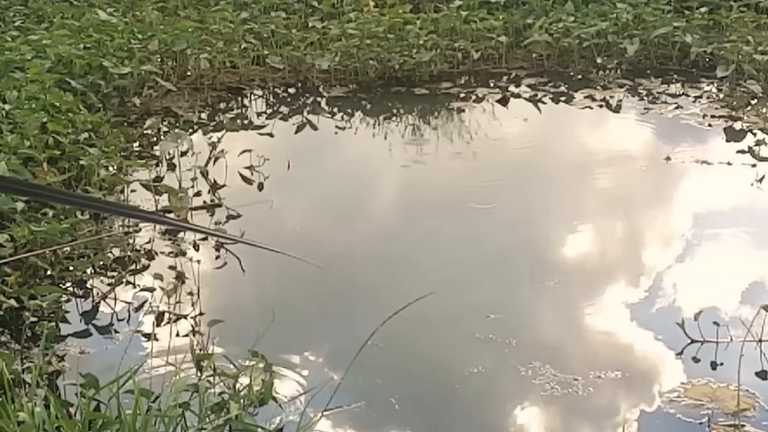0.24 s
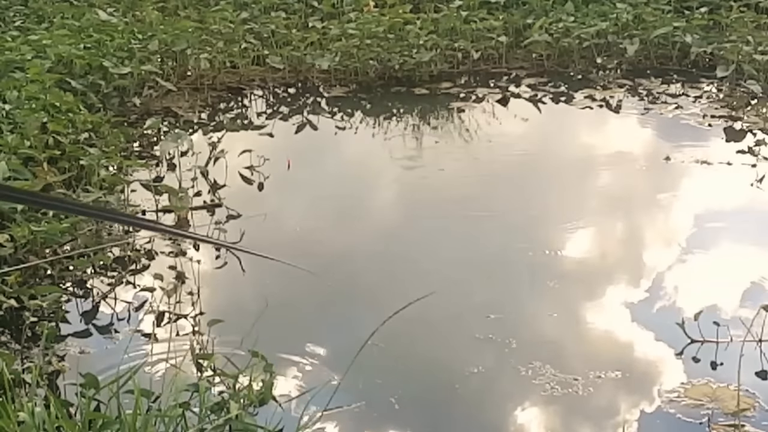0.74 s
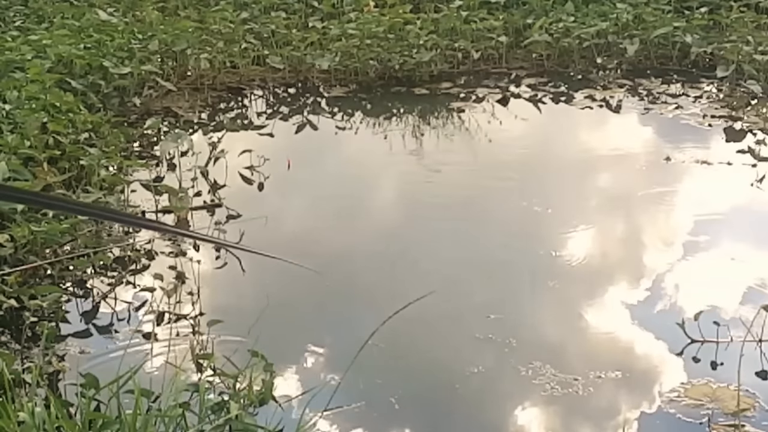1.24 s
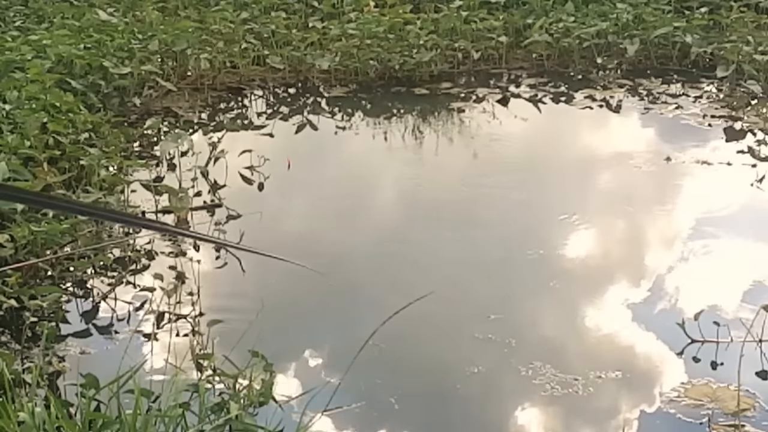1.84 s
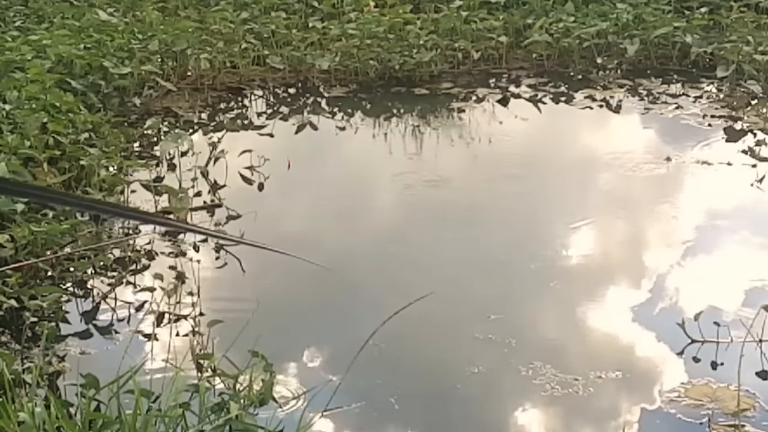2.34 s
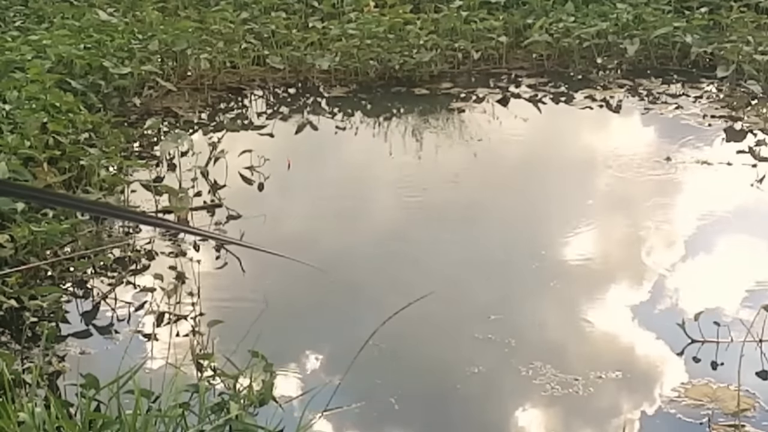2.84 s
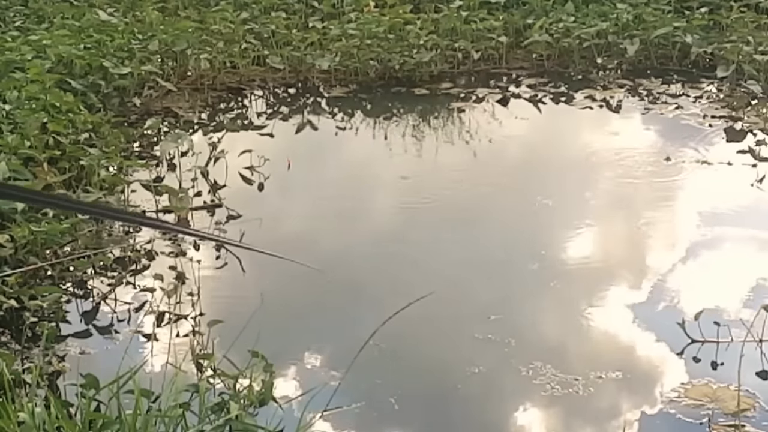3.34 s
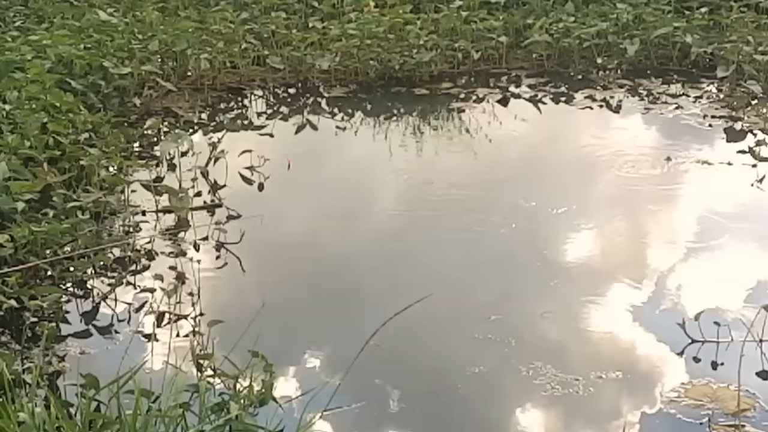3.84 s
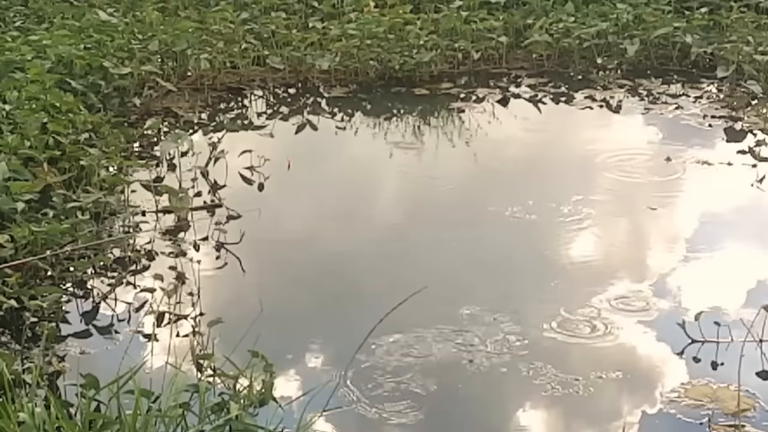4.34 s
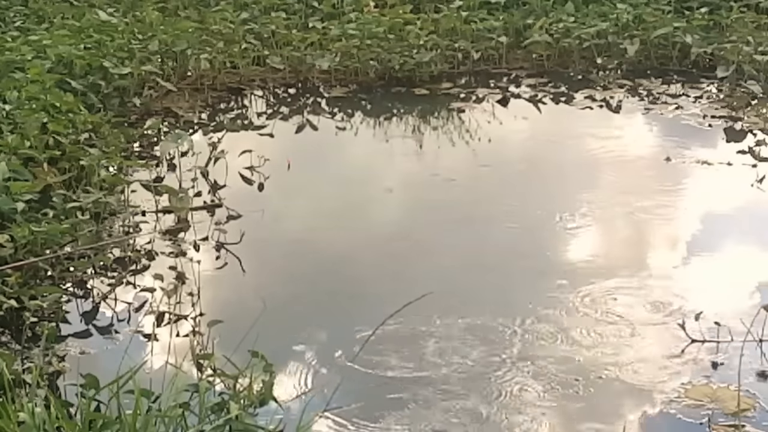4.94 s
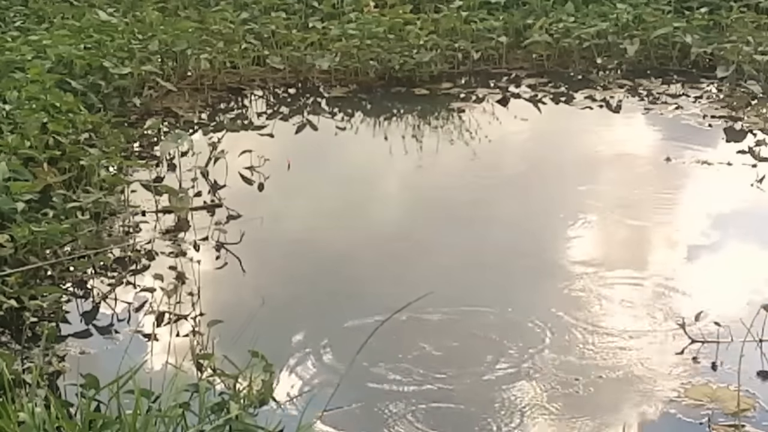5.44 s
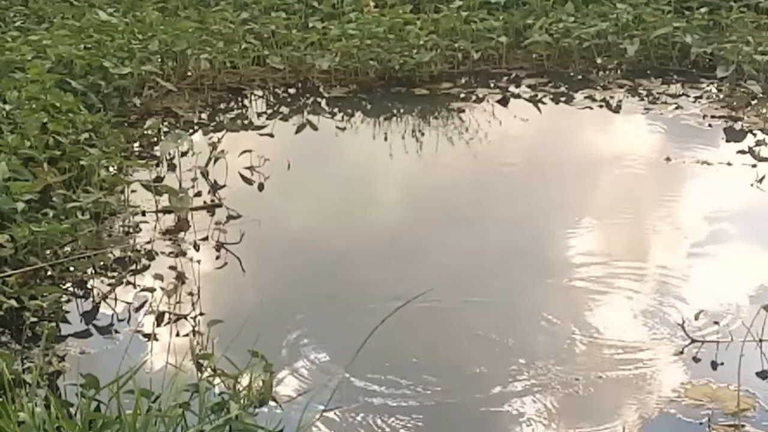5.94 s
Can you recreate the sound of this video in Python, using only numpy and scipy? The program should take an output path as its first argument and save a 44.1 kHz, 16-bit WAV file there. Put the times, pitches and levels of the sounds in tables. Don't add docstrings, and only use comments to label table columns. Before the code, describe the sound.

A quiet stereo outdoor scene of about six seconds. Throughout, insects chirr in a bright, finely pulsing band around 8 kHz, with a thinner sizzle above. Underneath, a distant engine drones near 48 and 95 Hz, sagging and recovering, with a weak pump hum, far traffic and soft field hush. Faint bird peeps fall before 1 s. Small drips sound at 0.5 s; soft low thumps at 0.75 and 1.2 s, the first with a little plop. Sparse dry ticks run from 1.8 to 3.3 s among tiny drops. From 3.5 to 3.95 s a bird repeats a quick falling note while clicks grow; around 4 s sharper rod ticks meet a small splash and fine spray lasting a third of a second. Lighter thumps come at 4.3 and 4.55 s, with knocks and drips until 4.85 s. A faint whistle rises at 5.15 s, a plop follows at 5.7 s, and a short low plop ends it near 6.2 s.

```python
import sys
import numpy as np
from scipy import signal
from scipy.fft import rfft, irfft, next_fast_len
from scipy.io import wavfile
from scipy.ndimage import uniform_filter1d, map_coordinates

SR = 44100
rng = np.random.default_rng(int(sys.argv[2]) if len(sys.argv) > 2 else 0)


def boost_factor(decibels):
    exponent = np.asarray(decibels, float) / 20
    return 10 ** exponent


def generate_wav(sig):
    pcm = np.round(np.clip(np.atleast_2d(sig).T, -1, 1) * 32767).astype(np.int16)
    wavfile.write(sys.argv[1], SR, pcm)


N = 272979
PORT_LAG_MS = 0.38


def unit(x):
    return x / np.sqrt(np.mean(x ** 2) + 1e-20)


def along(points, hz):
    f, v = np.transpose(points)
    return np.interp(np.log(hz + 1), np.log(f + 1), v)


def curves(rows):
    s, *cols = np.transpose(rows)
    return [np.interp(np.arange(N) / SR, s, c) for c in cols]


def wobble(rate):
    knots = rng.standard_normal(int(N * rate / SR) + 4)
    return map_coordinates(knots, [np.arange(N) * rate / SR])


def filtered(x, response):
    m = next_fast_len(N + 8192)
    return irfft(rfft(x, m) * response(np.fft.rfftfreq(m, 1 / SR)), m)[..., :N]


def mode(hz, width_hz):
    return lambda f: 1j * f * width_hz / (hz * hz - f * f + 1j * f * width_hz)


def ports(pair, alike, lag_ms):
    turn = lambda f: np.arccos(np.clip(alike(f), -1, 1)) / 2
    mid, side = filtered(pair, lambda f: np.array([np.cos(turn(f)), np.sin(turn(f))]))
    late = lambda f: np.exp(1j * np.pi * f * lag_ms / 1000 * np.array([[1], [-1]]))
    return filtered(np.array([mid + side, mid - side]), late)


def rush(spectrum, patchy_db):
    # frequency in Hz, likeness from 0 to 1.
    likeness = [(100, .99), (200, .96), (350, .8), (600, .66), (1000, .52), (1500, .48), (2500, .3),
                (4000, .08)]
    z = signal.stft(rng.standard_normal((2, N)), nperseg=512)[2]
    field = uniform_filter1d(rng.standard_normal(z.shape[1:]), size=6, axis=0)
    field = uniform_filter1d(field, size=12, axis=1)
    pair = signal.istft(z * boost_factor(patchy_db * unit(field)), nperseg=512)[1][:, :N]
    pair = filtered(pair, lambda f: boost_factor(along(spectrum, f)))
    return unit(ports(pair, lambda f: along(likeness, f), PORT_LAG_MS))


def add(track, s, sound):
    part = track[..., round(s * SR):][..., :sound.shape[-1]]
    part += sound[..., :part.shape[-1]]


def insects():
    # wing pitch in Hz, width in Hz, level in dB, left over right in dB,
    # left-right likeness from 0 to 1, lag of the right port in ms.
    singers = [(7624, 515, -56, -5.5, 0.7, -0.04), (8245, 540, -57, 0, 0, 0.069),
               (8074, 506, -50.5, 1, 0, -0.019), (7807, 870, -53, -2.5, 0, 0.0066),
               (8557, 530, -65.5, 11.5, 0.3, -0.0007), (9260, 1400, -75, 9.5, 0, -0.081)]
    # phrases per second, time of a phrase peak in seconds,
    # share of silence from 0 to 1, wing strokes per second, stroke depth from 0 to 1.
    rhythms = [(9.05, .005, .6, 123.74, .35), (15.02, .035, .55, 96.3, .4), (20, 0, .04, 100.3, .1),
               (13.9, 0, .1, 92, .2), (19.9, 0, .15, 100.3, .2), (11, 0, .1, 88, .1)]
    # time in seconds, level in dB.
    swells = [
        (0.0, -79),
        (0.65, -78.5),
        (0.79, -77),
        (1.71, -77.5),
        (1.84, -77),
        (3.55, -79.5),
        (4.0, -77),
        (5.14, -79.5),
        (6.19, -76.5),
    ]
    # frequency in Hz, level in dB per Hz.
    grass_colour = [(8000, -33), (9700, -7), (10500, -12), (11200, 2.5), (12000, 1), (13500, 3.5),
                    (14600, 0), (16000, -8)]
    t, out = np.arange(N) / SR, np.zeros((2, N))
    for singer, rhythm in zip(singers, rhythms):
        hz, width_hz, db, pan_db, alike, lag_ms = singer
        rate, peak, hush, strokes, depth = rhythm
        turn = rate * (t - peak)
        phrase = 1 - hush + hush * 2 * np.cos(np.pi * turn) ** 4
        beat = strokes * t + .5 * ((turn + .5) % 1) + 0.023 * wobble(8.3)
        stroke = 1 - depth + depth * 2 * np.cos(np.pi * beat) ** 2
        rasp = phrase * stroke * boost_factor(0.95 * wobble(2.58)) * rng.standard_normal((2, N))
        wing = filtered(rasp, lambda f: mode(hz, width_hz)(f) ** 3)
        heard = unit(ports(wing, lambda f: alike + 0 * f, lag_ms))
        out += boost_factor(db + np.array([[pan_db], [-pan_db]]) / 2) * heard
    chirr = boost_factor(-54 + 3 + 0.39 * wobble(1.7)) * unit(out)
    swell_db, = curves(swells)
    sizzle_db = swell_db + 4 + 0.2 * wobble(7.4) + 0.44 * wobble(25) + [[1.2], [-1.2]]
    return chirr + boost_factor(sizzle_db) * rush(grass_colour, patchy_db=-0.5)


def rod():
    # start in seconds,
    # peak in dB, pitch in Hz, crack level in dB, upward reach of the crack in octaves.
    ahead_clicks = [(1.828, -55.5, 3030, -13, .6), (2.165, -60, 5710, -16, .4),
                    (2.449, -56, 2600, -8.5, 0.59), (2.959, -59, 2726, 7, 0.72), (3.238, -60, 2521, 2, .55),
                    (3.475, -50.5, 3190, -5, .6), (3.4806, -54.5, 3434, 10, 0.66),
                    (3.5231, -55.5, 2450, 8, 0.84), (3.978, -50.5, 1170, 12, 1.8),
                    (4.0486, -61, 4380, 11, 0.87), (4.051, -51, 2263, 8.5, 2.02),
                    (4.0566, -65.5, 4008, 22.5, 1.1), (4.568, -63, 3000, 10, 0.62),
                    (4.836, -62, 4500, 8, 0.59)]
    left_clicks = [
        (2.577, -51, 2285, -10, 0.68),
        (2.705, -50, 2360, -3, 0.8),
    ]
    right_clicks = [
        (4.5178, -51.5, 3010, 3.3, 0.77),
        (4.7449, -47, 2113, 3, 0.95),
    ]
    out, t = np.zeros((2, N)), np.arange(SR // 20) / SR
    places = [(0, ahead_clicks), (PORT_LAG_MS, left_clicks), (-PORT_LAG_MS, right_clicks)]
    for lag_ms, clicks in places:
        for s, db, hz, crack_db, reach in clicks:
            ring = boost_factor(-60 * t / 0.014) * np.sin(2 * np.pi * hz * t)
            snap = (t == 0) + 0.3 * boost_factor(-60 * t / 0.0027) * rng.standard_normal(len(t))
            top_hz = min(hz * 2 ** np.clip(reach, .3, 4), 13000)
            band = signal.butter(2, [0.97 * hz, top_hz], "bandpass", fs=SR)
            contact = boost_factor(db) * (ring - boost_factor(crack_db + 15.0) * signal.lfilter(*band, snap))
            add(out[0], s - lag_ms / 2000, contact)
            add(out[1], s + lag_ms / 2000, contact)
    return out


def bubbles(s, length, db, hz, spread):
    shape = (max(60, round(1400 * length)), 1)
    start, pitch, size = rng.random(shape), rng.standard_normal(shape), rng.exponential(size=shape)
    t = np.arange(round((length + .04) * SR)) / SR
    age = np.clip(t - length * start ** 1.2, 0, None)
    cycles = hz * 2 ** (spread * (pitch - pitch.mean())) * age
    tone = np.sin(2 * np.pi * cycles * (1 + .006 * cycles)) * np.exp(-cycles / 6)
    return boost_factor(db) * unit((boost_factor(2 * size) * tone).sum(axis=0))


def water():
    # start in seconds, length in
    # seconds, level in dB, pitch in Hz.
    trickles = [
        (0.568, 0.088, -70.5, 1910),
        (1.416, .012, -67, 1570),
        (2.532, 0.018, -68, 2000),
        (2.73, .09, -78.5, 2430),
        (3.081, 0.076, -71.5, 2400),
        (3.303, 0.018, -77, 2350),
        (3.362, 0.093, -74.5, 2500),
        (4.521, 0.029, -66.5, 2212),
        (4.768, 0.027, -72, 2423),
        (3.989, .05, -68, 1530),
    ]
    drips = [(.54, 0.027, -58, 1510), (1.192, .03, -63, 1540), (2.51, 0.053, -67, 1540),
             (2.27, 0.034, -78, 2150), (3.34, .06, -69, 1280), (3.975, 0.051, -65, 1402),
             (4.025, 0.027, -62, 2500), (4.515, .04, -60.5, 511), (4.52, .04, -61.5, 1304),
             (4.671, 0.023, -61.5, 1348), (4.66, 0.033, -70, 2120), (4.768, .035, -57, 996)]
    splashes = [
        (0.543, 0.034, -73, 2310),
        (.72, 0.026, -62.5, 667),
        (2.163, 0.0082, -59, 475),
        (4.044, 0.021, -65, 1720),
        (4.069, .28, -72, 5380),
        (4.31, .05, -62.5, 688),
        (5.71, .04, -64.5, 1175),
        (6.183, 0.0085, -53.5, 500),
    ]
    pitch_spreads = (.07, .19, .5)
    # start in seconds, peak in dB, pitch in Hz, time to fall 60 dB in seconds.
    thumps = [
        (0.736, -31, 145, 0.056),
        (1.204, -33, 141, 0.063),
        (4.336, -38, 138, 0.058),
        (4.547, -38.5, 121.5, 0.05),
    ]
    out, t = np.zeros(N), np.arange(SR // 6) / SR
    for clusters, spread in zip((trickles, drips, splashes), pitch_spreads):
        for s, length, db, hz in clusters:
            add(out, s, bubbles(s, length, db, hz, spread))
    for s, db, hz, t60 in thumps:
        swell = 1 - np.exp(-t / 0.012)
        add(out, s, boost_factor(db + 8.5 - 60 * t / t60) * swell * np.sin(2 * np.pi * hz * t))
    return out


def bird(notes, lag_ms):
    out = np.zeros(N)
    warble = wobble(90)
    for s, length, from_hz, to_hz, db in notes:
        u = np.linspace(0, 1, round(length * SR))
        tone = np.sin(2 * np.pi * np.cumsum(from_hz + (to_hz - from_hz) * u) / SR)
        add(out, s, boost_factor(db + 3) * np.sin(np.pi * u) ** .3 * tone)
    return ports(np.array([out * boost_factor(1.8 * warble), np.zeros(N)]), np.ones_like, lag_ms)


def birds():
    # start in seconds, length in seconds, level in dB.
    song_notes = [
        (3.493, .025, -70),
        (3.606, 0.027, -66.5),
        (3.711, .036, -64.5),
        (3.81, .043, -64),
        (3.936, 0.027, -65),
    ]
    # start in seconds, length in seconds,
    # first pitch in Hz, last pitch in Hz, level in dB.
    peeps = [
        (0.091, .05, 2880, 2920, -73),
        (0.126, 0.24, 2340, 2250, -78),
        (0.302, 0.07, 2910, 2800, -75),
        (0.637, 0.0399, 2920, 2800, -73),
        (0.699, 0.044, 2620, 2520, -69),
        (0.954, 0.029, 3400, 2930, -70),
        (2.905, .02, 3337, 3000, -76),
        (4.063, .022, 3480, 3850, -72),
        (4.172, 0.027, 4700, 4320, -68),
    ]
    sweeps = [
        (2.96, 0.014, 3000, 3900, -68),
        (3.232, 0.16, 3980, 5642, -75),
        (3.577, .012, 4300, 3640, -59),
        (5.15, 0.19, 3683, 5760, -73),
        (5.4, 0.02, 4220, 3610, -77),
    ]
    note_hz, fall_hz_per_s = 3453, 5200
    song = [(s, length, note_hz, note_hz - fall_hz_per_s * length, db) for s, length, db in song_notes]
    graces = [(s - 0.027, .011, 3753, note_hz, db - 6) for s, _, db in song_notes]
    return bird(song + graces + peeps, lag_ms=.097) + bird(sweeps, lag_ms=-.075)


def banks(x, t60):
    t = np.arange(SR // 5) / SR
    tail = rng.standard_normal((2, len(t))) * boost_factor(-60 * t / t60) * (t > .003)
    return signal.fftconvolve(x, tail / np.linalg.norm(tail[0]), axes=1)[:, :N]


def machines():
    # time in seconds, firing rate in Hz,
    # load, heard as the level of the tone at twice that rate, in dB.
    engine_run = [(0.0, 47.5, -51), (0.36, 47.5, -47.5), (0.72, 47.7, -55), (0.77, 46.4, -47),
                  (1.14, 46.78, -51), (1.46, 45.77, -46.5), (1.84, 49.6, -56), (2.5, 48.76, -60),
                  (2.7, 48.94, -56.5), (2.96, 46.14, -45), (3.41, 49.44, -57), (3.52, 48.2, -66),
                  (3.6, 46.95, -48.5), (4.53, 48.9, -51.5), (4.75, 49.64, -61), (4.9, 47.63, -51.5),
                  (5.3, 47.33, -50), (6.19, 47.57, -52.5)]
    # pitch in Hz, width in Hz, level in dB.
    pump_hums = [
        (137.3, 0.726, -64.5),
        (400, 12, -78.5),
        (634, 8, -75.5),
        (1100, 11, -85),
    ]
    hz, second_db = curves(engine_run)
    first_db = -51.5 + 0.27 * (second_db - second_db.mean())
    turn = 2 * np.pi * np.cumsum(hz) / SR
    drone = boost_factor(first_db + 1.1 * wobble(4.9)) * np.sin(turn + 0.085 * wobble(11))
    drone += boost_factor(second_db + 0.43 * wobble(11)) * np.sin(2 * turn + 1.48 + 0.077 * wobble(3.8))
    drone += boost_factor(second_db - 21 + 2.5 * wobble(8)) * np.sin(4 * turn + .6 * wobble(9))
    t = np.arange(N) / SR
    for hum_hz, width_hz, db in pump_hums:
        phase = 2 * np.pi * hum_hz * t
        drone += boost_factor(db + 2 * wobble(width_hz)) * np.sin(phase + 1.2 * wobble(width_hz))
    pair = np.array([np.sqrt(2) * drone, 0 * t])
    return boost_factor([[.2], [-.2]]) * ports(pair, np.ones_like, PORT_LAG_MS)


def distance():
    # time in seconds, density in dB.
    traffic = [
        (0.0, -64),
        (1.43, -64.5),
        (1.71, -65),
        (2.43, -65),
        (2.65, -64.5),
        (4.09, -64.5),
        (4.53, -63.5),
        (5.45, -64.5),
        (6.19, -64),
    ]
    # frequency in Hz, level in dB per Hz.
    rumble_colour = [(25, -53), (36, -29), (50, 2), (75, 0.5), (110, -2.5), (170, -9), (215, -12),
                     (250, -26), (330, -57.5)]
    air_colour = [(120, -62), (200, -9.5), (299, -11), (391, -10.5), (425, -12), (511, -9.5), (935, -15.5),
                  (1030, -15.5), (5920, -31.5), (7870, -20), (11000, -47), (14300, -55), (22000, -120)]
    density_db, = curves(traffic)
    swing_db = density_db - density_db.mean()
    rumble_db = -53 + 0.39 * swing_db + 0.86 * wobble(5.0)
    air_db = -60.5 + swing_db + 0.38 * wobble(6)
    rumble = boost_factor(rumble_db) * rush(rumble_colour, patchy_db=1.5)
    return rumble + boost_factor(air_db) * rush(air_colour, patchy_db=1.3)


def scene():
    left = ports(np.array([water(), np.zeros(N)]), np.ones_like, PORT_LAG_MS)
    near = rod() + left + birds()
    return insects() + machines() + distance() + near + boost_factor(-10) * banks(near, t60=.05)


def top_cut(x):
    return signal.sosfilt(signal.butter(12, 14540, fs=SR, output="sos"), x)


def record(dry):
    band = filtered(dry - .0006, lambda f: f < 14540)
    return top_cut(band)


dry = scene()
out = record(dry)
generate_wav(out)
```